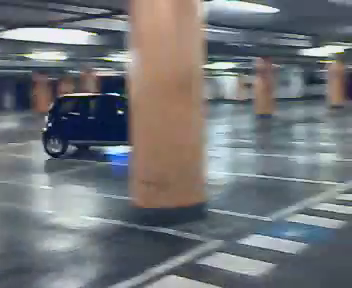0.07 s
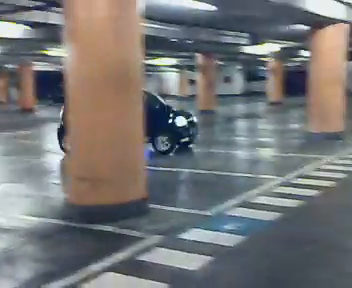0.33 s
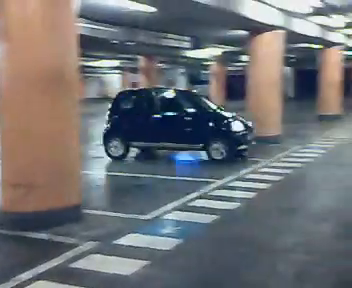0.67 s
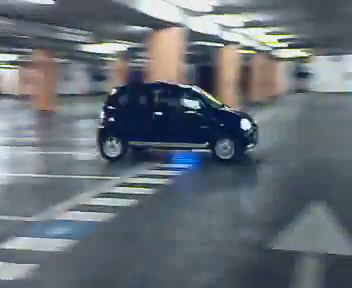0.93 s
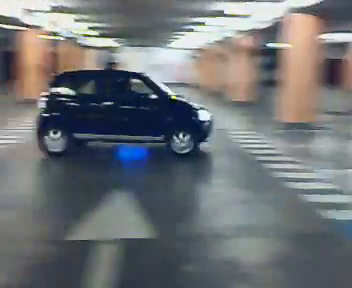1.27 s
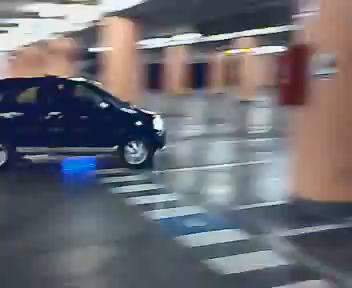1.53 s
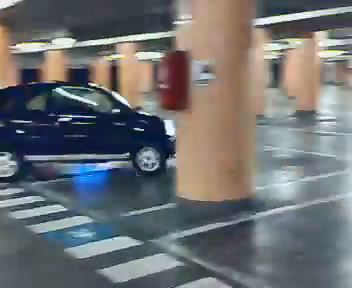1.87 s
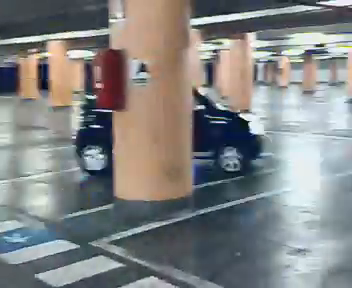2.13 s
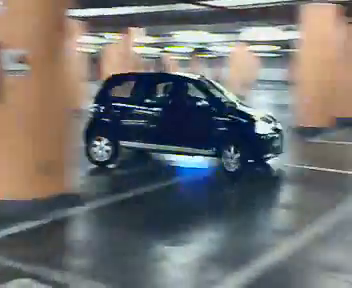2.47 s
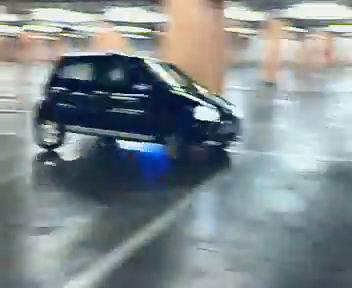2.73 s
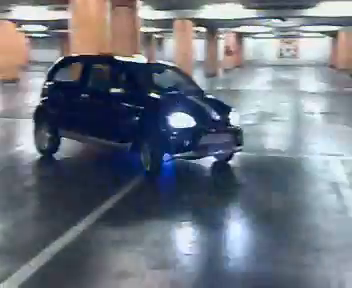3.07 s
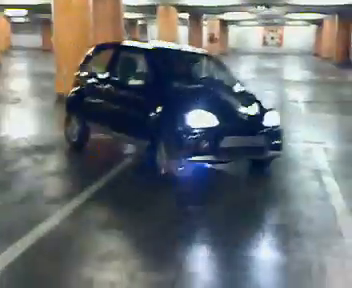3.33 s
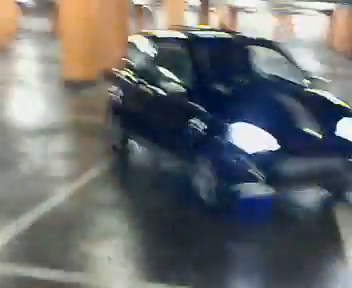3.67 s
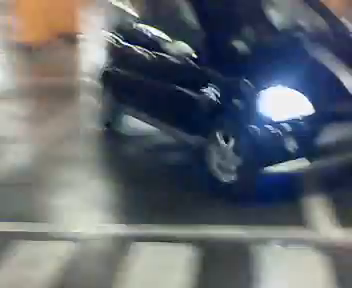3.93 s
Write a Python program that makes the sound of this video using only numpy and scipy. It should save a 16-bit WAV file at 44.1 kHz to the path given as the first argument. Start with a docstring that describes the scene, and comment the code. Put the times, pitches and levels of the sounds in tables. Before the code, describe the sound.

A small car's engine drones and echoes in a garage as a tyre squeaks once.

```python
"""A small car drives through a concrete parking garage. Its exhaust drones in harmonics of the firing
rate, the hall reverberates, and tyres roll on the painted floor. Just before two seconds one tyre
squeaks by stick-slip friction. The driver lifts off and the drone sinks, while the hall's resonances
hold the notes it has left. The pitch rises again in a turn, where the tyres scrub.
Throughout, a small overloaded microphone rounds the peaks."""
import sys
import numpy as np
from scipy import signal
from scipy.io import wavfile

SR = 44100
rng = np.random.default_rng(int(sys.argv[2]) if len(sys.argv) > 2 else 0)


def unload_wav(signal):
    """Save mono or channel-first audio to the path in sys.argv[1] as 16-bit WAV at rate SR, clipped to [-1, 1]."""
    wavfile.write(
        sys.argv[1],
        SR,
        np.round(np.clip(np.atleast_2d(signal).T, -1, 1) * 32767).astype(np.int16),
    )


N = 176400
TIME = np.arange(N) / SR

# Engine speed: time_s, firing_hz
FIRING_RATE = [(0.0, 60.77), (0.3, 60.32), (0.6, 59.6), (1.0, 58.7), (1.4, 58.5), (1.7, 57.58),
               (2.0, 56.65), (2.15, 56.03), (2.25, 51.2), (2.32, 46.37), (2.44, 43.1), (2.56, 41.9),
               (2.8, 38.07), (2.92, 38.14), (3.04, 40.68), (3.16, 43.5), (3.28, 46.3), (3.4, 49.0),
               (3.64, 52.74), (3.76, 53.37), (3.88, 50.2), (4.0, 49.55)]
# Exhaust orders 1 to 6 (multiples of the firing rate), before trim: time_s, level_db
ORDER_1 = [(0.0, -18.5), (0.09, -38), (0.66, -22), (0.87, -31), (1.32, -23), (1.53, -33), (1.8, -31),
           (1.89, -30), (2.07, -20), (2.22, -39.5), (2.25, -27), (2.55, -36.5), (3.3, -26.5), (3.99, -30.5)]
ORDER_2 = [(0.0, -8.5), (0.12, -6), (0.24, -15.5), (0.36, -9.5), (0.48, -18.5), (0.6, -9.5), (0.81, -5),
           (0.87, -14), (0.99, -5), (1.14, -16.5), (1.2, -9), (1.44, -5.5), (1.62, -13.5), (2.16, -8.5),
           (2.341, -36.5), (3.03, -31), (3.33, -23), (3.75, -21), (3.93, -23), (3.99, -21)]
ORDER_3 = [(0.0, -27.5), (0.3, -18), (0.36, -33), (0.45, -11.5), (0.78, -34.5), (0.87, -14.5), (1.11, -30),
           (1.199, -18), (1.32, -25), (1.68, -20), (1.92, -26.5), (2.94, -28.5), (3.09, -10), (3.15, -22.5),
           (3.18, -14.5), (3.33, -24.5), (3.84, -19), (3.99, -29.5)]
ORDER_4 = [(0.0, -39), (0.331, -19), (0.45, -47), (0.48, -25), (0.629, -31), (1.53, -16.5), (1.591, -26.5),
           (1.62, -11.5), (1.68, -21.5), (1.77, -12), (1.92, -17.5), (2.01, -8.5), (2.28, -32),
           (3.42, -23.5), (3.78, -14.5), (3.99, -22.5)]
ORDER_5 = [(0.0, -30), (0.03, -35), (1.56, -24), (2.07, -16), (2.22, -41.5), (2.43, -36), (2.49, -49.5),
           (3.15, -15), (3.3, -24), (3.36, -12), (3.42, -42), (3.99, -38)]
ORDER_6 = [(0.0, -33), (0.18, -20), (0.42, -36), (0.66, -33), (1.38, -24.5), (1.711, -30.5), (1.77, -19),
           (1.92, -34), (3.06, -35), (3.27, -23), (3.33, -48), (3.99, -34)]
# Gain added to each of these orders: trim_db
ORDER_TRIMS = [1.2, 1.1, 1.2, 0.97, 0.63, .8]
# Weaker overtones of the exhaust: order, mean_level_db
OVERTONES = [(7, -39.5), (8, -40.5), (11, -36), (13, -36.5), (16, -38)]
# Envelopes of tyre and engine-bay noise, roar and hiss before trim: time_s, level_db
RUMBLE_LEVEL = [(0, -24.5), (1.5, -22.5), (2.3, -22.5), (2.8, -28.5), (3.2, -21.5), (4, -19)]
ROAR_LEVEL = [(0.0, -21.5), (0.07, -20.5), (0.2, -20.5), (1.02, -19), (1.12, -17.5), (1.35, -19),
              (1.78, -17), (2.13, -23), (2.77, -25.5), (3.83, -20.5), (4.0, -20.5)]
HISS_LEVEL = [(0.0, -27), (0.07, -34), (0.15, -29.5), (0.4, -33.5), (0.9, -28.5), (0.97, -29.5),
              (1.08, -28), (1.4, -29), (1.57, -27), (1.87, -28), (1.93, -30.5), (2.26, -37), (2.34, -35),
              (3.17, -33), (3.3, -30.5), (4.0, -31)]
# Their spectral densities: frequency_hz, relative_db
RUMBLE_SPECTRUM = [(22, -28), (35, -6.5), (48, -1), (70, -4.5), (110, 2.5), (150, -1), (220, 1),
                   (300, -4.5), (450, -19.5)]
ROAR_SPECTRUM = [(300, 0.5), (480, -4), (680, 1), (850, -3), (1050, -4), (1420, -0.5), (1750, -7.5),
                 (2150, -4.5), (2550, -20.5), (3000, -12.5), (3600, -26), (5000, -25.5)]
HISS_SPECTRUM = [(2000, -9), (3000, 3), (3800, -4), (4500, 2), (5300, -1.7), (6000, 2.5), (6600, -4.5),
                 (7300, 1.5), (8000, -21)]
# Faint engine whines: centre_s, half_width_s, order, level_db
WHINES = [(1.08, 0.37, 11, -27.5), (1.855, 0.39, 13, -31)]
# Envelope of the squeak: time_s, level_db
SQUEAK_LEVEL = [(1.849, -40), (1.856, -7), (1.867, -10), (1.871, -18), (1.875, -11), (1.881, -13),
                (1.885, -4), (1.889, -15), (1.898, -25), (1.902, -12), (1.908, -19), (1.93, -21),
                (1.94, -42), (1.998, -42), (2.006, -23), (2.02, -50)]
# Its stick-slip frequency: time_s, pitch_hz
SQUEAK_PITCH = [(1.85, 2971), (1.866, 2860), (1.876, 3030), (1.885, 2950), (1.892, 2982), (1.903, 2827),
                (1.915, 2990), (1.93, 2900)]
# Its ring in the hall: centre_hz, bandwidth_hz, level_db
SQUEAK_RING = [(2907, 46, -32.5), (3060, 45, -34)]
# Low notes that the hall holds when the engine leaves them: handover_s, order, pitch_hz
HELD_NOTES = [(2.17, 2, 114.7), (3.06, 3, 120.5), (2.14, 4, 227.4), (2.14, 5, 284.5)]
# One curve per held note, swelling and dipping as the hall's close resonances beat and die away:
# time_s, level_db
HELD_LEVELS = [
    [(2.12, -35), (2.22, -4.5), (2.36, -9.5), (2.45, -14), (2.55, -25), (2.65, -12), (2.82, -16.5),
     (2.95, -18), (3.3, -23), (3.6, -45)],
    [(2.95, -50), (3.1, -18), (3.4, -18.5), (3.65, -20), (4.0, -31)],
    [(2.05, -36), (2.2, -17.5), (2.39, -12), (2.53, -31), (2.66, -14), (2.86, -17.5), (2.96, -30.5),
     (3.35, -19.5), (3.5, -29), (4.0, -30)],
    [(2.1, -45), (2.22, -21.5), (2.4, -33.5), (2.8, -29), (3.1, -43)],
]
# Scrub and sizzle of the turning tyres: centre_s, half_width_s, centre_hz, bandwidth_hz, level_db
SCRUBS = [(2.99, 0.12, 1423, 300, -26.5), (2.79, 0.27, 2290, 190, -35), (2.65, 0.4, 5250, 630, -40.5),
          (3.8, 0.59, 5250, 590, -39)]


def from_db(db):
    """Amplitude grows tenfold with every 20 dB."""
    return 10 ** (np.asarray(db) / 20)


def unit_rms(x):
    """Dividing by the rms gives unit power."""
    return x / np.sqrt(np.mean(x ** 2) + 1e-20)


def in_time(curve):
    """Linear interpolation gives a curve's value at every sample."""
    return np.interp(TIME, *np.transpose(curve))


def swell(centre_s, half_width_s):
    """A Gaussian envelope of height 1 falls to 1/e at one half-width."""
    return np.exp(-np.minimum(((TIME - centre_s) / half_width_s) ** 2, 20))


def drift(rate_hz):
    """Low-pass filtered noise fluctuates slowly, with an rms of 1."""
    step, settling = 40, 2000
    pole = np.exp(-2 * np.pi * rate_hz * step / SR)
    white = rng.standard_normal(N // step + settling + 2)
    slow = signal.lfilter([1], [1, -2 * pole, pole * pole], white)[settling:]
    return np.interp(np.arange(N) / step, np.arange(len(slow)), unit_rms(slow))


def band_pass(x, low_hz, high_hz):
    """A Butterworth filter passes the band between its edges."""
    return signal.sosfilt(signal.butter(2, [low_hz, high_hz], "band", fs=SR, output="sos"), x)


def narrow_noise(centre_hz, bandwidth_hz):
    """A randomly driven resonance gives narrow-band noise; rms 1."""
    white = rng.standard_normal(N)
    return unit_rms(band_pass(white, centre_hz - bandwidth_hz / 2, centre_hz + bandwidth_hz / 2))


def banded_noise(spectrum, flicker_db):
    """Independently modulated quarter-octave bands add up to a flickering spectrum; rms 1."""
    hz, db = np.transpose(sorted(spectrum))
    edges_hz = 20 * 2 ** np.arange(0, 9, .25)
    white, out = rng.standard_normal((2, N + SR // 2)), 0
    for k, (low, high) in enumerate(zip(edges_hz, edges_hz[1:])):
        level_db = np.interp(np.log(low * high) / 2, np.log(hz), db, left=-90, right=-90)
        flicker = flicker_db * drift(15)
        if level_db > -80:
            out += band_pass(white[k % 2], low, high)[-N:] * from_db(level_db + flicker)
    return unit_rms(out)


def exhaust(phase, offsets, roar_db):
    """Periodic firing gives a harmonic series; six orders swell and fade across standing waves."""
    curves, out = [ORDER_1, ORDER_2, ORDER_3, ORDER_4, ORDER_5, ORDER_6], 0
    for order, (curve, trim_db) in enumerate(zip(curves, ORDER_TRIMS), 1):
        flutter_db = 0.3167 * order ** 1.31 * drift(6)
        waver_rad = 0.011 * order ** 2 * drift(4)
        amplitude = from_db(in_time(curve) + trim_db + flutter_db)
        out += amplitude * np.sin(order * phase + waver_rad + offsets[order - 1])
    follow_db = 0.75 * (roar_db - roar_db.mean())   # the overtones rise and fall with the roar
    for order, mean_db in OVERTONES:
        amplitude = from_db(mean_db + follow_db + 2.5 * drift(1.9))
        out += amplitude * np.sin(order * phase + 1.3 * drift(4))
    return np.sqrt(2) * out


def hall(x, t60_s):
    """Dense reflections from floor, ceiling and pillars form an exponentially decaying reverberation."""
    tail = rng.standard_normal(N) * from_db(-60 * TIME / t60_s) * (TIME > .012)
    return signal.fftconvolve(x, tail / np.linalg.norm(tail))[:N]


def rolling(phase, roar_db):
    """Tyres and engine bay radiate broadband noise; the firing modulates the roar's amplitude."""
    roar_trim_db, hiss_trim_db = 1.5, 0.5
    throb = 1 + 0.076 * np.sin(phase)
    roar = from_db(roar_db + roar_trim_db) * banded_noise(ROAR_SPECTRUM, flicker_db=0.32)
    hiss = from_db(in_time(HISS_LEVEL) + hiss_trim_db) * banded_noise(HISS_SPECTRUM, flicker_db=0.1)
    rumble = from_db(in_time(RUMBLE_LEVEL)) * banded_noise(RUMBLE_SPECTRUM, flicker_db=1.5)
    return roar * throb + hiss + rumble


def engine_whine(phase):
    """High harmonics of the firing rate swell briefly and are heard as faint whines."""
    out = 0
    for centre_s, half_width_s, order, level_db in WHINES:
        amplitude = from_db(level_db + 2.5 * drift(12)) * swell(centre_s, half_width_s)
        out += amplitude * np.sin(order * phase + .5 * drift(4.6))
    return np.sqrt(2) * out


def tyre_squeak():
    """Stick-slip friction of rubber on paint gives a chattering tone; the hall rings on near its pitch."""
    wobble, chatter_db = .015, 2.8
    ring_start_s, ring_t60_s = 1.88, 3.1
    pitch_hz = in_time(SQUEAK_PITCH) * (1 + wobble * drift(150))
    tone = np.sin(2 * np.pi * np.cumsum(pitch_hz) / SR)
    ring = sum(from_db(db) * narrow_noise(hz, bandwidth_hz) for hz, bandwidth_hz, db in SQUEAK_RING)
    decay = (TIME > ring_start_s) * from_db(-60 * np.abs(TIME - ring_start_s) / ring_t60_s)
    sounding = (TIME > SQUEAK_LEVEL[0][0]) & (TIME < SQUEAK_LEVEL[-1][0])
    amplitude = sounding * from_db(in_time(SQUEAK_LEVEL) + chatter_db * drift(140))
    return amplitude * tone + ring * decay


def held_notes(phase, offsets):
    """Room resonances take over notes in phase with the engine and ring on at constant pitch."""
    rise_s, beat_db = 0.097, 1.66
    out = 0
    for (handover_s, order, pitch_hz), curve in zip(HELD_NOTES, HELD_LEVELS):
        fade_in = np.clip(1 + (TIME - curve[0][0]) / rise_s, 0, 1)
        amplitude = fade_in * from_db(in_time(curve) + beat_db * drift(5.58))
        handover_rad = order * np.interp(handover_s, TIME, phase) + offsets[order - 1]
        out += amplitude * np.sin(handover_rad + 2 * np.pi * pitch_hz * (TIME - handover_s))
    return np.sqrt(2) * out


def tyre_scrub():
    """Sliding friction of the turning tyres excites resonances in soft swells."""
    return sum(from_db(level_db) * swell(centre_s, half_width_s) * narrow_noise(centre_hz, bandwidth_hz)
               for centre_s, half_width_s, centre_hz, bandwidth_hz, level_db in SCRUBS)


def scene():
    """The car's direct sound and the hall's response add by superposition, in one channel."""
    phase = 2 * np.pi * np.cumsum(in_time(FIRING_RATE)) / SR
    offsets = rng.uniform(0, 2 * np.pi, size=6)
    roar_db = in_time(ROAR_LEVEL)
    engine = exhaust(phase, offsets, roar_db) + engine_whine(phase)
    boom = from_db(-19.5) * hall(engine, t60_s=3.5) + held_notes(phase, offsets)
    return (engine + boom + rolling(phase, roar_db) + tyre_squeak() + tyre_scrub())[None]


def record(dry):
    """Soft saturation in the microphone rounds the peaks; a steep low-pass filter cuts the treble."""
    ceiling, knee, cutoff_hz = .73, 4, 7600
    rounded = dry / (1 + np.abs(dry / ceiling) ** knee) ** (1 / knee)
    return signal.sosfilt(signal.ellip(10, .3, 70, cutoff_hz, fs=SR, output="sos"), rounded)


dry = scene()
out = record(dry)
unload_wav(out)
```